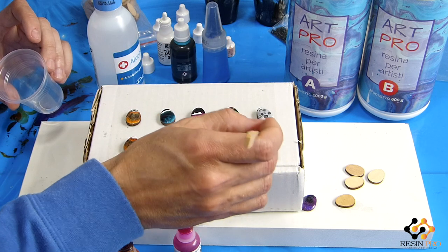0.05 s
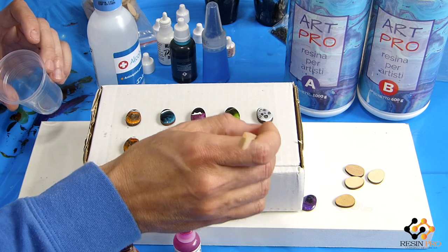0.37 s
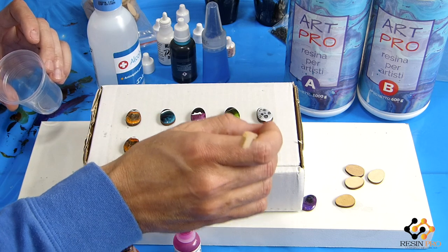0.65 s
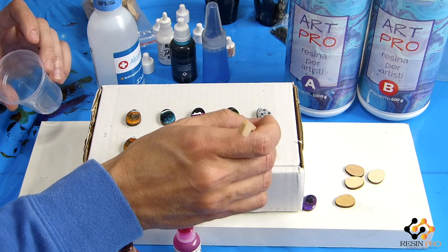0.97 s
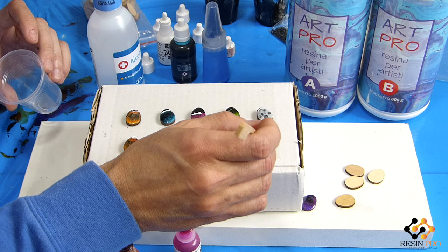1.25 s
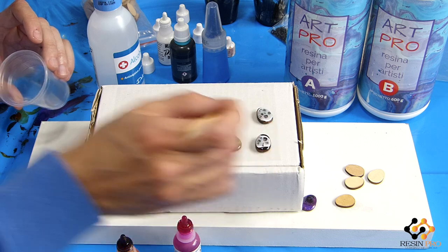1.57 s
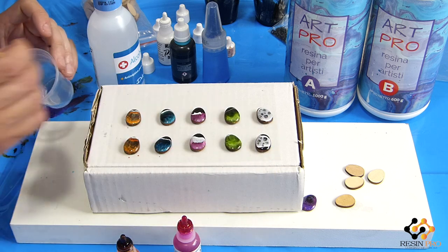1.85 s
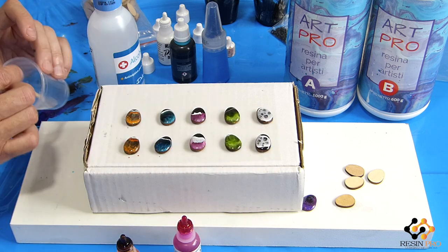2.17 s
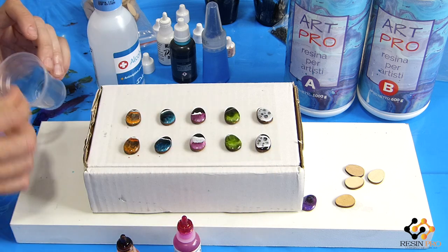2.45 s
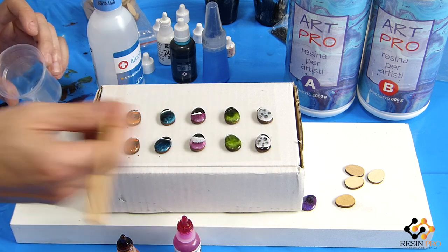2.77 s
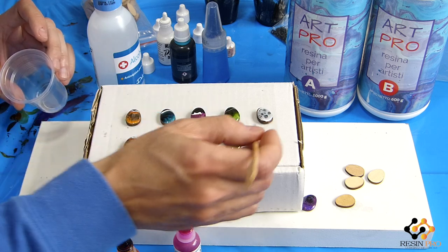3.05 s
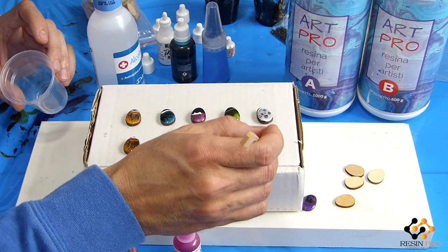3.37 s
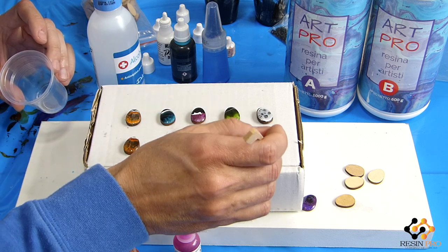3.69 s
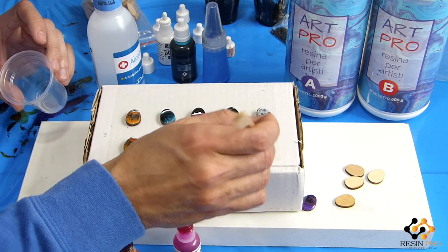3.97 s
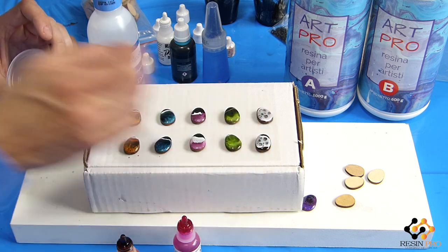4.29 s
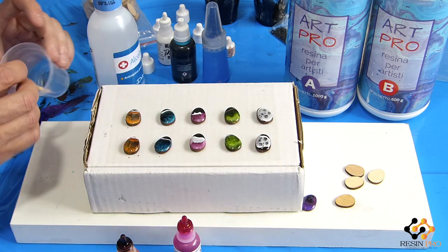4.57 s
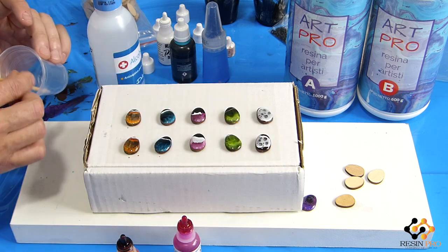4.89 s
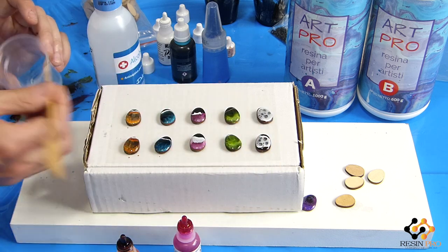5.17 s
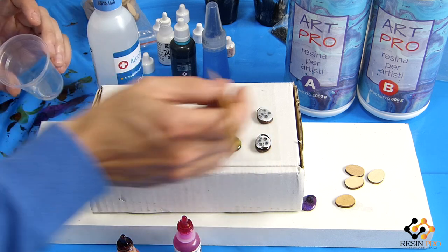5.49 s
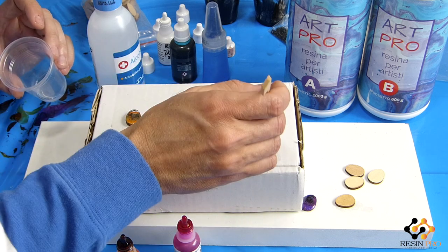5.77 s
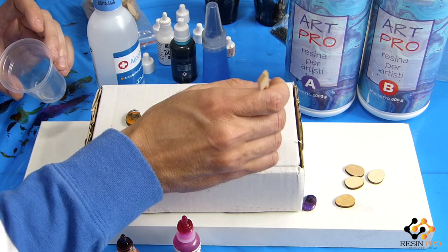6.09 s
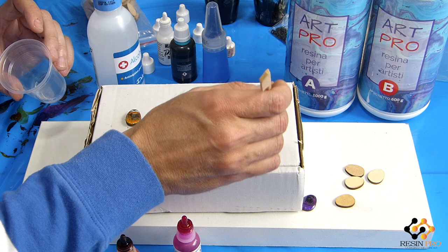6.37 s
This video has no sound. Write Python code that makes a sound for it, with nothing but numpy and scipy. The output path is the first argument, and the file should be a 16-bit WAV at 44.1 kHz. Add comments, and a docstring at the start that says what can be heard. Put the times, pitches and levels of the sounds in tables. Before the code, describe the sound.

Faint hollow taps of a wooden stick on small stones, with clicks and short scrapes in a plastic cup and soft sleeve rustles.

```python
"""In a small quiet room, a wooden stick dabs resin on stones lying on a cardboard box: soft hollow taps.
A sleeve rustles, and from 1.7 s the stick scoops resin from a small plastic cup, scraping and clicking
so that the cup's wall rings. Now and then an arm bumps, rubs or slides on the table. After one lone faint
tick, more dabs follow at 3.5 s, a second scoop at 4.7 s, and the last, firmest dabs from 6 s."""
import sys
import numpy as np
from scipy import signal
from scipy.fft import rfft, irfft
from scipy.io import wavfile

SR = 44100
rng = np.random.default_rng(int(sys.argv[2]) if len(sys.argv) > 2 else 0)


def materialize(psi):
    """Save the field psi as 16-bit PCM at rate SR to the path in sys.argv[1].

    A 1-D psi becomes a single channel; in a 2-D psi each row is a channel.
    """
    bounded = np.clip(np.atleast_2d(psi).T, -1, 1)
    quanta = np.round(bounded * 32767).astype(np.int16)
    wavfile.write(sys.argv[1], SR, quanta)


N = 292824

# the tones the cup's wall rings with: (frequency [Hz], level [dB], time to fade by 60 dB [s])
CUP_TONES = [(492, -23, 0.037), (611, -8, 0.0097), (699, 1.5, 0.015), (763, -8.5, 0.034), (881, -19, 0.14),
             (1061, -5.5, 0.052), (1105, -3.5, 0.053), (1187, -4, 0.036), (1344, -6.5, 0.037),
             (1440, -12, 0.065), (1660, -8.5, 0.02), (1950, -18, 0.012), (2230, -13, 0.018)]


def amp(db):
    """Turns decibels into a factor to multiply a sound by."""
    return 10 ** (np.asarray(db) / 20)


def unit(x):
    """Scales a signal to an average size (rms) of 1."""
    return x / np.sqrt(np.mean(x ** 2) + 1e-20)


def read(points, hz):
    """Looks up a (frequency, value) table, blending between rows on a musical pitch scale."""
    row_hz, value = np.transpose(points)
    return np.interp(np.log(hz + 1), np.log(row_hz + 1), value)


def bins(size):
    """The frequencies in the spectrum of a sound this many samples long."""
    return np.fft.rfftfreq(size, 1 / SR)


def add(mix, start_s, sound):
    """Lays a sound into the mix at its start time."""
    part = mix[max(round(start_s * SR), 0):][:len(sound)]
    part += sound[:len(part)]


def colour(x, curve_db, size=2048):
    """Shapes a sound's bass and treble by curve_db(Hz), with a filter of energy 1."""
    hz = abs(np.fft.fftfreq(size, 1 / SR))
    log_gain = np.log(amp(np.maximum(curve_db(hz), -90)))
    response = np.exp(np.conj(signal.hilbert(log_gain)))  # nothing comes out before it goes in
    taps = np.fft.ifft(response).real
    return signal.fftconvolve(x, taps / np.linalg.norm(taps))


def tilted(points, tilt_db):
    """A table's curve, made brighter by tilt_db for each octave above 1000 Hz."""
    return lambda hz: read(points, hz) + tilt_db * np.log2(np.maximum(hz, 1000) / 6000)


def stereo(shared, opposed, width):
    """Left and right channels: one signal is the same in both, the other has opposite signs."""
    mid = rfft(shared)
    side = rfft(opposed) * amp(read(width, bins(len(shared))))
    return irfft(np.array([mid + side, mid - side]), len(shared))


def friction(size, per_s, spread_db):
    """Rubbing surfaces catch and let go: many tiny slips of uneven strength."""
    slipping = rng.random(size) < per_s / SR
    strength = amp(spread_db * np.minimum(rng.exponential(1, size), 4))
    return unit(slipping * strength * rng.standard_normal(size))


def stroke(length_s, peak):
    """A push that swells and lets go; peak is the share of its length spent swelling."""
    progress = np.linspace(0, 1, max(int(length_s * SR), 16))
    return np.sin(np.pi * np.interp(progress, [0, peak, 1], [0, .5, 1]))


def ring(tones, pitch, tilt_db, vary_db=1.34):
    """A struck object rings with fading tones, a little different on each hit."""
    t = np.arange(SR // 3) / SR
    sound = np.zeros(len(t))
    for hz, db, fade_s in tones:
        start_db = db + tilt_db * np.log2(hz / 1000) + vary_db * rng.standard_normal()
        sound += amp(start_db - 60 * t / fade_s) * np.sin(2 * np.pi * (hz * pitch * t + rng.random()))
    attack = 1 - np.exp(-(t / 0.0011) ** 2)
    # an object gives off little sound below its lowest tone
    bass_cut = signal.butter(2, 0.59 * tones[0][0], "highpass", fs=SR)
    sound = signal.lfilter(*bass_cut, sound * attack)
    return sound / np.sqrt(np.sum(sound ** 2) / (SR / 100))  # the energy of 10 ms at rms 1


def shake(slips, tones):
    """Slips keep an object ringing; the result has as much energy as the slips."""
    shaken = signal.fftconvolve(slips, ring(tones, pitch=0.97, tilt_db=0))
    return shaken * np.linalg.norm(slips) / np.linalg.norm(shaken)


def room_tone(level_db=-68.5):
    """The room's steady low murmur and faint hiss, widest in the middle frequencies."""
    # background noise: (frequency [Hz], level [dB])
    spectrum = [(12, -40), (20, -3), (88, -5), (146, -3.5), (367, -6), (499, -5.5), (542, -8), (738, -5.5),
                (825, -7), (1090, -8), (1220, -7.5), (2460, -14.5), (9950, -17), (14300, -20.5),
                (16000, -32)]
    # its stereo width: (frequency [Hz], opposed minus shared level [dB])
    width = [(60, -6), (99, -3.5), (160, 1.5), (270, 9), (450, 11), (740, 10), (1220, 5), (2010, 4),
             (3330, 1), (5500, 0.5), (9080, -6.5), (15000, -27)]
    gain = amp(read(spectrum, bins(N)))
    shared, opposed = irfft(rfft(rng.standard_normal((2, N))) * gain, N)
    return amp(level_db) * stereo(unit(shared), unit(opposed), width)


def click(decay_s, tilt_db, snap=0.79):
    """Two things touch: one sharp snap inside a very short chatter of contacts."""
    # the dry click: (frequency [Hz], level [dB])
    spectrum = [(80, -41.5), (300, -19.5), (800, -7.5), (1600, -9), (3000, -14), (4300, -7), (5400, -1),
                (6900, -4.5), (8300, -8.5), (11000, -17.5), (15500, -49)]
    t = np.arange(SR // 100) / SR
    chatter = rng.standard_normal(len(t)) * t * np.exp(-t / decay_s)
    chatter /= np.linalg.norm(chatter)
    chatter[SR // 2000] += snap
    sound = colour(chatter, tilted(spectrum, tilt_db))
    return sound / np.sqrt(np.sum(sound ** 2) / (SR / 1000))  # the energy of 1 ms at rms 1


def box_dabs(knock_db=-1, settle_db=-7, tick_db=-4):
    """The stick touches a stone: a faint tick, a knock of the box, a dull rattle as the stone settles."""
    # dabs on the stones: (time [s], strength [dB], pitch factor)
    dabs = [(.002, -52.5, 1.23), (0.599, -60.5, 1.09), (.937, -52.5, 1.25), (.973, -62.5, 0.86),
            (1.216, -68.5, 1.32), (1.467, -69, 0.79), (3.534, -61, 1.15), (3.802, -58, 1.16),
            (4.04, -55.5, 1.305), (4.048, -60.5, 1.56), (4.072, -61, 1.04), (6.001, -45, 0.987),
            (6.045, -53, 0.92), (6.28, -48.5, 0.93), (6.433, -68, 1.1), (6.533, -64, 1.9),
            (6.54, -45.5, 0.975)]
    # the box's tones: (frequency before the pitch factor [Hz], level [dB], time to fade by 60 dB [s])
    box_tones = [(312, -13.5, 0.018), (439, -10.5, 0.029), (573, -14, 0.018), (875, -19, 0.022),
                 (1074, -1.5, 0.03), (1267, 3, 0.0087), (1564, -1, 0.014), (1780, -30, 0.014),
                 (2480, -21.5, 0.018)]
    # a stone rattling on cardboard: (frequency [Hz], level [dB])
    rattle_spectrum = [(100, -19), (250, -9.5), (450, -3.5), (750, -6.5), (1200, 0), (1700, -10),
                       (2500, -9.5), (4000, -19), (12000, -51)]
    out = np.zeros(N)
    for start, db, pitch in dabs:
        tilt_db = -0.6 + 0.52 * (db + 49)  # a harder dab sounds brighter
        add(out, start + 0.00097, amp(db + knock_db) * ring(box_tones, pitch, tilt_db))
        pressure = stroke(0.012, peak=0.2)
        slips = pressure * friction(len(pressure), per_s=2000, spread_db=1.5)
        rattle = colour(slips, lambda hz: read(rattle_spectrum, hz))
        rattle_db = db + settle_db - 0.39 * (db + 47.5)  # grows more slowly than the knock
        add(out, start + 0.00104, amp(rattle_db) * rattle)
        add(out, start, amp(db + tick_db) * click(decay_s=0.0011, tilt_db=-2, snap=0.19))
    return out


def sleeve_rustle(level_db=-3, rest_db=-78):
    """Cloth rubs with a fine hiss that grows louder as the arm moves faster."""
    # the arm swings between box and cup: (time [s], length [s], level [dB])
    swings = [(1.528, 0.69, -71), (2.618, 0.74, -69), (4.168, 0.13, -68.5), (4.258, 0.46, -71.5),
              (5.248, 0.68, -70.5)]
    # rustling cloth: (frequency [Hz], level [dB])
    spectrum = [(500, -9.5), (2000, -13), (4000, -8), (7000, -3), (9500, -8), (13000, -25), (16000, -22)]
    speed = np.full(N, amp(rest_db))
    for start, length, db in swings:
        add(speed, start, amp(db) * stroke(length, peak=0.57))
    slips = speed * friction(N, per_s=12000, spread_db=1.5)
    return amp(level_db) * colour(slips, lambda hz: read(spectrum, hz))[:N]


def scrape(length_s, hiss_db, wall_db, tilt_db, peak):
    """Wood grain catches on the cup: the slips hiss, shake the wall and set one of its tones singing."""
    # the hiss in the stick: (frequency [Hz], level [dB])
    spectrum = [(700, -26.5), (1500, -2), (2300, -6), (3200, -2.5), (4200, 0), (5200, 3.5), (7400, 4),
                (9000, -3), (12000, -10.5), (16000, -31)]
    sing_hz, sing_width_hz, build_s = 1105, 45, 0.085
    pressure = stroke(length_s, peak)
    slips = pressure * friction(len(pressure), per_s=7000, spread_db=2.6)
    sound = np.zeros(SR // 2)
    add(sound, 0, amp(hiss_db) * colour(slips, tilted(spectrum, tilt_db)))
    add(sound, 0, amp(wall_db) * shake(slips, CUP_TONES))
    sing_gain = amp(wall_db - 1) * min(length_s / build_s, 1) ** 2  # short strokes sing less
    sing_fade_s = np.log(1000) / np.pi / sing_width_hz
    add(sound, 0, sing_gain * shake(slips, [(sing_hz, 0, sing_fade_s)]))
    return sound


def rim_scrapes(hiss_db=-1):
    """The stick is drawn along the cup and wiped on its rim."""
    # strokes: (time [s], length [s], hiss [dB], shaking of the wall [dB], brightness [dB per octave])
    scrapes = [(1.74, 0.031, -51, -77, -4.5), (2.157, 0.037, -54, -62, 2), (2.233, 0.054, -41.5, -53, 6),
               (2.285, 0.11, -45, -72, -2), (2.39, 0.056, -45, -63, -1), (2.482, 0.06, -59, -75, -1),
               (2.538, 0.052, -49.5, -58, 0.5), (2.579, 0.088, -52.5, -63, 2.5),
               (4.706, 0.043, -54, -66, -1.5), (4.784, 0.053, -35, -42.5, 2.5),
               (4.853, 0.061, -41.5, -54, 3.5), (4.932, 0.063, -51.5, -56, -2),
               (5.033, 0.097, -48.5, -63.5, 1.5), (5.237, 0.036, -43, -50, -6), (5.253, 0.046, -39, -55, 1)]
    out = np.zeros(N)
    for start, length, db, wall_db, tilt_db in scrapes:
        add(out, start, scrape(length, db + hiss_db, wall_db, tilt_db, peak=0.28))
    return out


def arm_rubs(rasp_db=-1, thud_db=-1, drag_db=-2):
    """The arm bumps the table, then skids on it with a short rasp that keeps the top humming."""
    # the arm meets the table: (time [s], length [s], rasp [dB], bump [dB])
    rubs = [(1.744, 0.027, -60.5, -57.5), (1.948, 0.063, -52, -51.5), (3.026, 0.031, -45, -53.5),
            (4.548, 0.083, -59, -54.5), (5.483, 0.022, -63, -78), (5.614, .058, -73, -58.5)]
    # table top tones, played a little lower: (frequency [Hz], level [dB], time to fade by 60 dB [s])
    table_tones = [(135, -7.5, 0.028), (203, -7.5, 0.1), (267, -10, 0.24), (322, 1, 0.046), (460, 1, 0.023),
                   (600, 0.5, 0.024), (850, 9, 0.0084), (1250, -7, 0.027)]

    def rasp_curve(hz, centre_hz=2000, half_width_octaves=0.27):
        """One band of frequencies stands out, and the highest treble is cut."""
        distance = np.log2((hz + 1) / centre_hz) / half_width_octaves
        return -13 * np.log10(1 + distance ** 2) - 40 * np.log10(1 + (hz / 10000) ** 4)

    out = np.zeros(N)
    for start, length, db, bump_db in rubs:
        pressure = stroke(length, peak=0.23)
        slips = pressure * friction(len(pressure), per_s=2400, spread_db=0.5)
        add(out, start + 0.0022, amp(db + rasp_db) * colour(slips, rasp_curve))
        add(out, start, amp(bump_db + thud_db) * ring(table_tones, pitch=0.928, tilt_db=2.1))
        add(out, start, amp(bump_db + drag_db) * shake(slips, table_tones))
    return out


def dry_clicks(click_db=2):
    """Stick or fingers click on the cup, with a hollow ring and a short skid; one faint tick is alone."""
    # clicks on the cup, and the lone tick at 3.156 s: (time [s], click [dB], ring [dB])
    clicks = [(1.7475, -64, -71), (2.1821, -23, -35.5), (2.1898, -35.5, -41), (2.197, -41, -28.5),
              (2.2847, -28.5, -52.5), (2.3215, -36.5, -51), (2.348, -32.5, -54), (2.355, -29.5, -36),
              (2.4819, -52, -67), (2.4942, -50, -72), (2.502, -54, -69), (2.545, -39.5, -65.5),
              (3.156, -51, -83), (4.6702, -47.5, -57), (4.7333, -19, -28.5), (4.7983, -20, -45),
              (4.861, -34, -55), (4.9347, -39.5, -41), (4.998, -25, -42.5), (5.2374, -41, -59)]
    out = np.zeros(N)
    for start, db, ring_db in clicks:
        tilt_db = -3 - 0.16 * (ring_db - db)  # the more ring beside the click, the duller the click
        add(out, start, amp(db + click_db) * click(decay_s=0.00067, tilt_db=tilt_db))
        add(out, start + 0.00098, amp(ring_db) * ring(CUP_TONES, pitch=1, tilt_db=-3.7))
        skid = scrape(0.029, hiss_db=ring_db - 13.5, wall_db=ring_db - 9.5, tilt_db=-2.5, peak=0.29)
        add(out, start, skid)
    return out


def arm_shuffle(level_db=-2, rise_s=0.022, fade_db=-17.5):
    """The forearm lands and slides to rest: a lumpy low shuffle through the table top."""
    # the forearm's slides: (time [s], length [s], level [dB])
    slides = [(3.252, 0.3, -66), (5.07, .43, -54.5)]
    # sliding heard through the table: (frequency [Hz], level [dB])
    spectrum = [(50, -33), (100, -16), (150, -3.5), (200, 3.5), (255, -10), (350, -5.5), (500, -11.5),
                (700, -16), (1200, -17), (3000, -61)]
    weight = np.zeros(N)
    for start, length, db in slides:
        t = np.arange(0, length, 1 / SR)
        add(weight, start, np.minimum(t / rise_s, 1) * amp(db + fade_db * t / length))
    slips = weight * friction(N, per_s=1300, spread_db=0.6)
    return amp(level_db) * colour(slips, lambda hz: read(spectrum, hz))[:N]


def room_tail(build_s=0.0029):
    """Countless reflections blur into a stereo wash that builds quickly and dies away."""
    # how long the room rings: (frequency [Hz], time to fade by 60 dB [s])
    fade_times = [(200, 0.17), (700, 0.19), (1700, 0.2), (5000, 0.19), (12000, 0.15)]
    # the tail's stereo width: (frequency [Hz], opposed minus shared level [dB])
    width = [(100, -21), (200, -10), (350, -0.5), (600, -8.5), (1200, -6), (2500, -5), (5000, -18.5),
             (7000, -9), (9500, 0.5), (13000, -21)]
    size = SR // 2
    hz, t, noise_bands = signal.stft(rng.standard_normal((2, size)), SR, nperseg=256)
    fade = amp(-60 * t / read(fade_times, hz)[:, None])
    tails = signal.istft(noise_bands * fade, SR, nperseg=256)[1][:, :size]
    tails *= 1 - np.exp(-(np.arange(size) / SR / build_s) ** 2)
    shared, opposed = tails / np.linalg.norm(tails[0])
    return stereo(shared, opposed, width)


def room(dry, tail_db, echo_db, tail_count=5, turns_per_s=23):
    """Direct sound, early echoes, and a short, smooth tail blended from several that take turns."""
    # echoes from near surfaces: (delay [s], level [dB])
    echoes = [(.0074, -10), (.0089, -13)]
    # how the sound leans to one side: (frequency [Hz], left minus right [dB])
    balance = [(150, -0.5), (330, 1.5), (500, 3.5), (770, 2), (1130, -1), (1800, 1.5), (2700, 2.5),
               (6400, 2.1), (9800, 2.5), (15000, 2.5)]
    heard = np.array([dry, dry])
    for delay, db in echoes:
        for channel in heard:
            add(channel, delay, amp(db + echo_db) * dry)
    turn = np.arange(N) / SR * turns_per_s
    for k in range(tail_count):  # each tail fades into the next, so no single pitch sticks out
        share = np.sin(np.pi / 2 * np.minimum((turn - k) % tail_count, 2))
        heard += amp(tail_db) * signal.fftconvolve((share * dry)[None], room_tail(), axes=1)[:, :N]
    return irfft(rfft(heard) * pan(read(balance, bins(N))), N)


def pan(left_db):
    """Left and right gains that make the left this much louder; below zero leans right."""
    return amp(np.array([[.5], [-.5]]) * left_db)


def scene():
    """Box, arm and cup all sound near the middle of one room, over its steady background."""
    box = pan(-0.4) * room(box_dabs(), tail_db=0, echo_db=-4.5)
    arm = pan(-0.3) * room(sleeve_rustle() + arm_rubs() + arm_shuffle(), tail_db=-1, echo_db=-1.8)
    cup = pan(-0.23) * room(rim_scrapes() + dry_clicks(), tail_db=-1.5, echo_db=-5)
    return room_tone() + box + arm + cup


def record(dry):
    """Cuts away the very highest treble, above 16000 Hz."""
    treble_cut = signal.firwin(511, 16000, window=("kaiser", 9), fs=SR)
    return signal.oaconvolve(dry, treble_cut[None], "same")


dry = scene()
out = record(dry)
materialize(out)
```